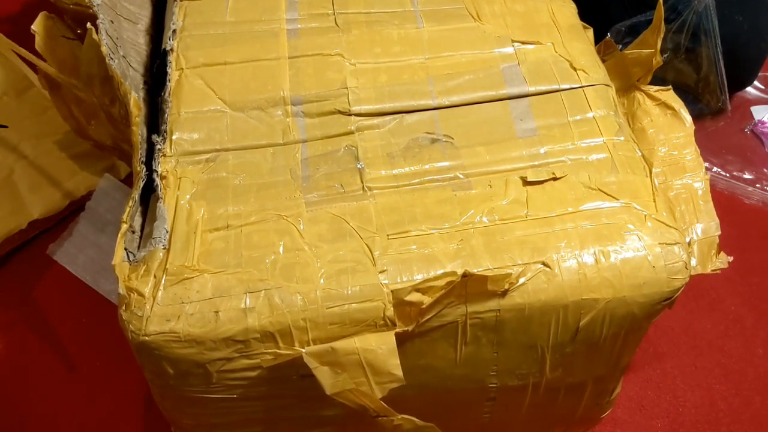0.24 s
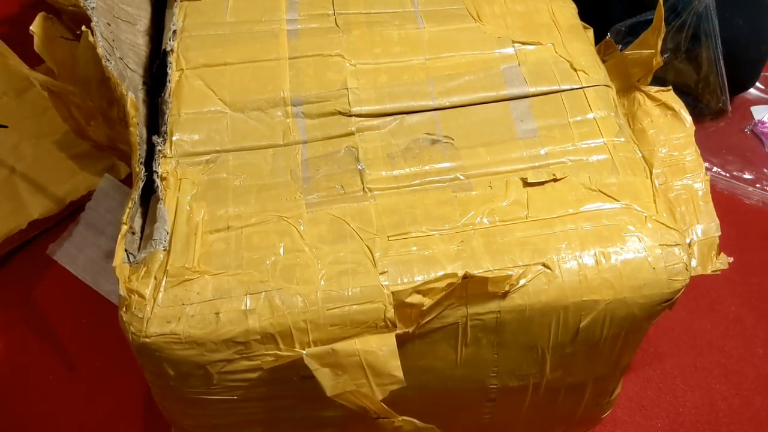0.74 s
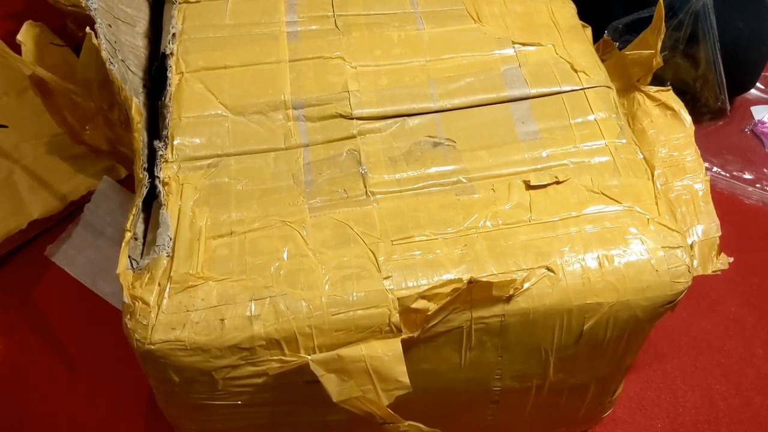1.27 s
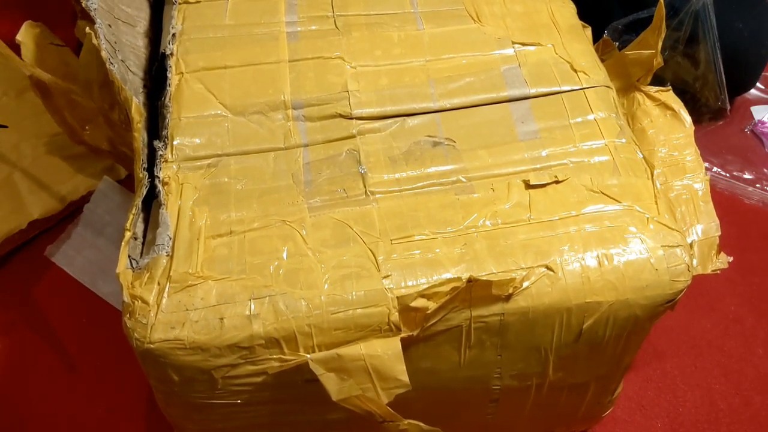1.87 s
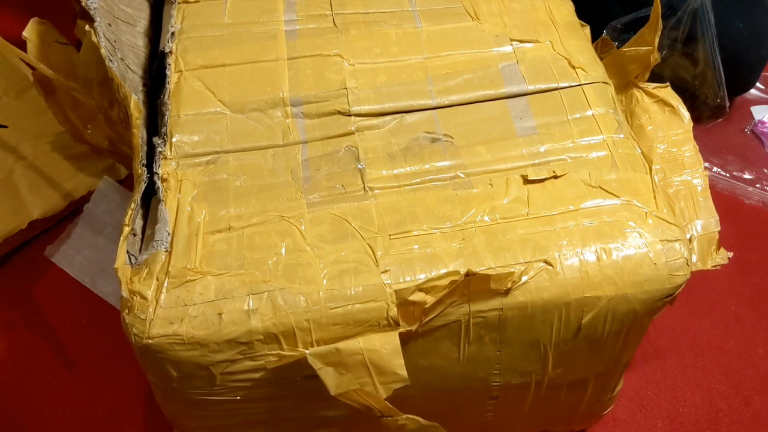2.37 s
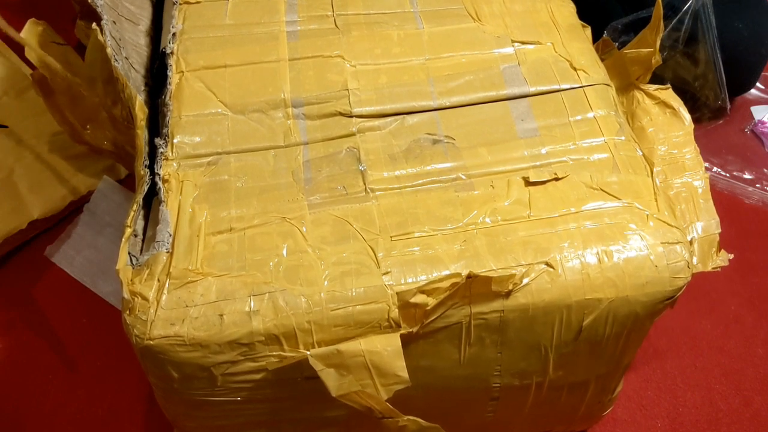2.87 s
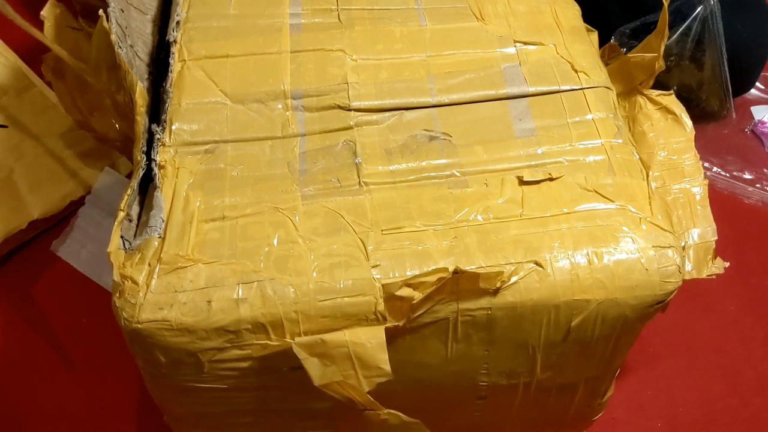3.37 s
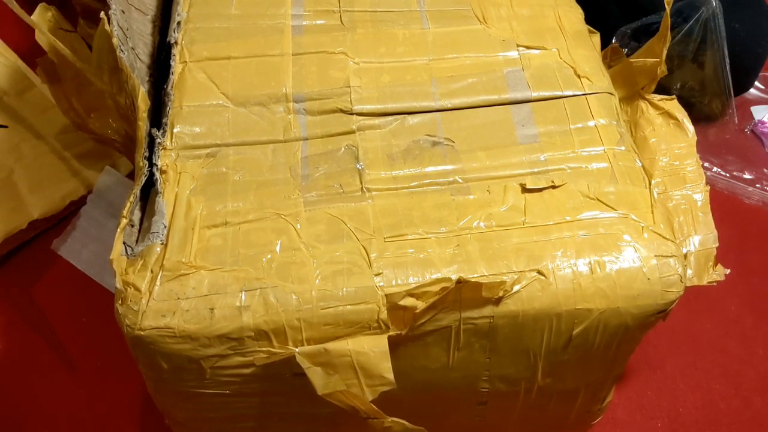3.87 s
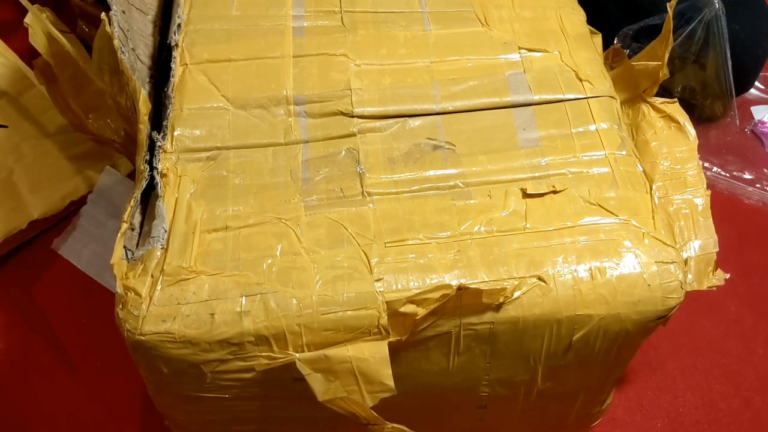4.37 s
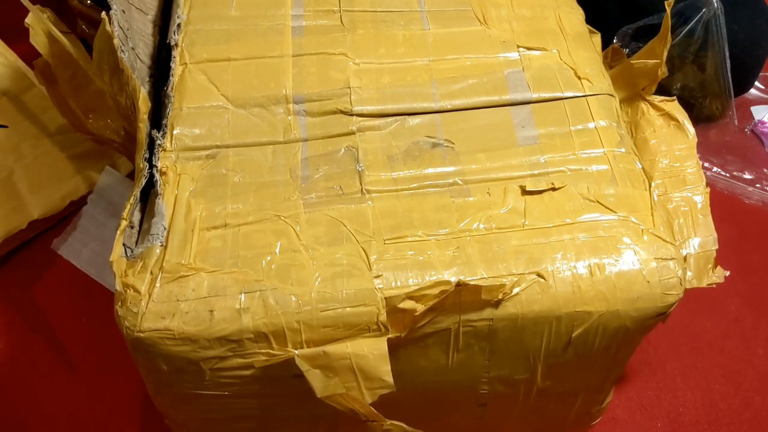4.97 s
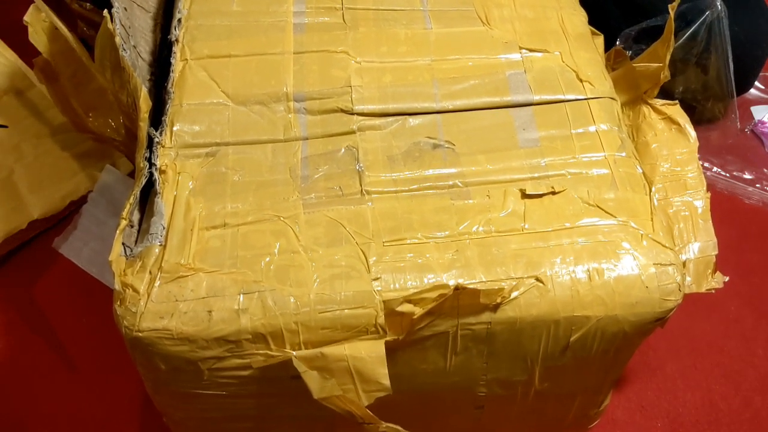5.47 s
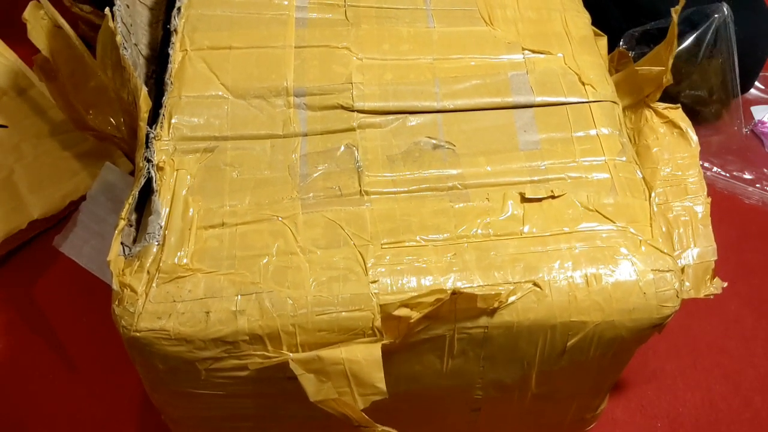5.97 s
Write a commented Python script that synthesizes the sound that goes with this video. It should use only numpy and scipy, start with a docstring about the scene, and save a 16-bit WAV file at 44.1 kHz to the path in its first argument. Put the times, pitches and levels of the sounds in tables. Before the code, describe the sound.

Dry crackles, fibre rasps and tape rustle from a blade working a hollow carton, sparse at first, then louder with heavier cracks.

```python
"""Scissors on a cardboard box

Scissors saw, rub and pry at a taped cardboard box in a small quiet room, a little to the left.
Dense trains of tiny blade slips, made of noise, ring the box wall, rasp the card and rustle the tape.
Short noise bursts make the snaps, and dying sine waves make the thumps of the hollow box.
A faint hum and hiss lie under it, and fading noise makes the echo of the room.
"""
import sys
import numpy as np
from scipy import signal
from scipy.fft import rfft, irfft, next_fast_len
from scipy.io import wavfile
from scipy.ndimage import map_coordinates

SR = 44100
rng = np.random.default_rng(int(sys.argv[2]) if len(sys.argv) > 2 else 0)


def undo_db(level):
    """Turn decibels back into plain size, where 20 dB means ten times bigger."""
    steps = np.asarray(level, float) / 20
    return 10 ** steps


def store_pcm(level_fs):
    """Save levels as 16-bit WAV."""
    pcm = np.round(np.clip(level_fs, -1, 1) * 32767).astype(np.int16)
    wavfile.write(sys.argv[1], SR, np.atleast_2d(pcm).T)


N = 275184  # length in samples
SECONDS = np.arange(N) / SR


def unit(x):
    """Scale to an rms of 1."""
    return x / np.sqrt(np.mean(x ** 2) + 1e-20)


def along(points, hz):
    """Read a value between (Hz, value) points, on a log frequency axis."""
    point_hz, value = np.transpose(points)
    return np.interp(np.log(hz + 1), np.log(point_hz + 1), value)


def wobble(rate):
    """A smooth random curve with rate knots a second."""
    knots = rng.standard_normal(int(N * rate / SR) + 4)
    return map_coordinates(knots, [np.arange(N) * rate / SR])


def filtered(x, response):
    """Shape a sound by a gain (real or complex) that depends on frequency."""
    size = next_fast_len(N + SR // 2)
    hz = np.fft.rfftfreq(size, 1 / SR)
    return irfft(rfft(x, size) * response(hz), size)[..., :N]


def modes(table):
    """A set of resonances (Hz, width Hz, dB), added with alternating sign."""
    def response(hz):
        total = 0
        for k, (centre, width, db) in enumerate(table):
            peak = 1j * hz * width / (centre * centre - hz * hz + 1j * hz * width)
            total = total + (-1) ** k * undo_db(db) * peak
        return total
    return response


def colour(spectrum):
    """Gain that follows a spectrum table."""
    return lambda hz: undo_db(along(spectrum, hz))


def spread(pair, alike):
    """Make left and right from a shared and an unshared signal, as alike as the table says."""
    turn = lambda hz: np.arccos(np.clip(along(alike, hz), -1, 1)) / 2
    mid, side = filtered(pair, lambda hz: np.array([np.cos(turn(hz)), np.sin(turn(hz))]))
    return np.array([mid + side, mid - side])


def slips(rate, life_s, scatter_db, smooth):
    """Two noises under one random train of dying slips (rate per second), over a smooth share."""
    chance, size_draw = rng.random((2, N))
    sizes = (chance < rate / SR) * undo_db(-scatter_db * np.log(size_draw + .02))
    train = signal.lfilter([1], [1, -np.exp(-1 / (life_s * SR))], sizes)
    envelope = (unit(train) + smooth) / (1 + smooth)
    return unit(envelope * rng.standard_normal((2, N)))


def add(track, s, sound):
    """Mix a sound into the track at time s."""
    start = round(s * SR)
    track[:, start:start + sound.shape[-1]] += sound


# Colour of the room's hiss and rumble: hz, level_db (per Hz, relative)
ROOM_TONE = [(15, -10), (25, 13.5), (123, 2.5), (344, -31), (887, -23), (2050, -18.5), (9570, -19),
             (15400, -34)]
# How alike left and right are, for the background and the echo: hz, likeness (0-1)
ALIKE_TONE = [(60, 0.79), (500, 0.05), (4000, 0.077)]


def room_tone():
    """Far hiss and rumble are coloured noise; the mains hum is a sine of unsteady pitch."""
    hiss = unit(spread(filtered(rng.standard_normal((2, N)), colour(ROOM_TONE)), ALIKE_TONE))
    hum_hz = 119.5 + 1.1 * wobble(3.9)
    hum = np.sin(2 * np.pi * np.cumsum(hum_hz) / SR) * undo_db(-69.5)
    return hiss * undo_db(-68.0) + hum


# How long the echo takes to fade by 60 dB: hz, fade_s
ROOM = [(150, 0.44), (1000, 0.25), (5000, 0.1)]


def room(x):
    """The walls answer with noise in which each frequency dies at its own speed; bass is most alike."""
    hz, t, grains = signal.stft(rng.standard_normal((2, SR // 3)), SR, nperseg=256)
    fade = undo_db(-60 * t / along(ROOM, hz)[:, None])
    tail = signal.istft(grains * fade, SR, nperseg=256)[1]
    delayed = np.pad(x, (300, 0))[None]  # in samples
    wet = signal.fftconvolve(delayed, tail / np.linalg.norm(tail[0]), axes=1)[:, :N]
    return spread(wet, ALIKE_TONE)


# Knocks on the hollow box: start_s, level_db (before the onset softens it), pitch_hz
KNOCKS = [(0.04, -50, 430), (0.053, -48.5, 480), (0.078, -55, 550), (0.295, -51, 94.2), (0.299, -52, 420),
          (0.437, -48.5, 196), (0.699, -47, 416), (0.974, -43, 135), (1.374, -37.5, 183), (1.532, -42, 113),
          (1.735, -41, 416), (1.8, -39.5, 192), (1.986, -38.5, 142), (2.236, -49, 403), (2.655, -42.5, 428),
          (2.708, -51, 493), (2.918, -37.5, 157), (3.1, -42, 347), (4.651, -32, 129), (4.661, -36, 967),
          (4.734, -35, 340), (4.846, -33.5, 414), (4.969, -39, 403), (5.555, -34, 61), (5.921, -45, 477)]


def knocks():
    """Each knock rings one hollow mode for a few cycles over a deep push."""
    track, t = np.zeros((2, N + SR)), np.arange(SR // 5) / SR
    onset = 1 - np.exp(-t / 0.00031)
    push = undo_db(-23.5) * np.sin(2 * np.pi * 62 * t) * undo_db(-60 * t / 0.43)
    for s, db, hz in KNOCKS:
        ring = np.sin(2 * np.pi * hz * t) * undo_db(-60 * t / 0.037)
        add(track[:1], s, undo_db(db) * (ring + push) * onset)  # only in the shared signal
    return track[:, :N]


# Resonances of the box wall: pitch_hz, width_hz, level_db
WALL = [(558, 160, -3), (898, 205, 6), (1205, 380, 7.5), (1329, 200, 9.5), (1630, 280, 0.5)]


def wall_ring(near_edge):
    """Low modes answer on the open panel, high modes near the stiff edge; above them it is dark."""
    edge_power = 4 * (np.clip(near_edge, 0, 1) - .5)
    tilt = lambda hz: np.abs((1 + 1j * hz / 500) / (1 + 1j * hz / 2500)) ** edge_power
    steep = lambda hz: 1 / (1 - (hz / 1750) ** 2 + 1j * hz / 1750 * 1.16)
    return lambda hz: modes(WALL)(hz) * tilt(hz) * steep(hz)


# Where the blade works: time_s, nearness to the box edge (0-1)
PLACE = [(.9, 0.3), (1.4, 0), (1.8, 0.5), (2.2, 0), (3, 0.66), (4, 1), (4.4, 0.7), (4.8, 0.25), (5.3, 0.93),
         (5.8, 0.95), (6.24, 0.52)]


def edge_nearness(seconds):
    """How near the blade is to the stiff edge of the box, gliding between the given places."""
    return np.interp(seconds, *np.transpose(PLACE))


LEAD_S = .001  # a snap creaks this long before it breaks


def bursts(count, t60, response):
    """Short dying noise pairs through a response, each of peak 1."""
    t = np.arange(SR // 20) / SR
    settling = undo_db(-19 - 700 * t)  # loose fibres settle behind the break
    envelope = np.where(t < LEAD_S, .15, undo_db(-60 * t / t60) + settling)
    noise = rng.standard_normal((count, 2, len(t))) * envelope
    noise[:, 0, round(LEAD_S * SR)] += 6  # the break itself is one sharp push
    rung = irfft(rfft(noise) * response(np.fft.rfftfreq(len(t), 1 / SR)))
    return rung / np.abs(rung).max(axis=(1, 2), keepdims=True)


# Snaps of tape and fibre: start_s, crack_peak_db, wall_peak_db, crack_pitch_hz
# (peaks before the sound is placed left and right)
SNAPS = [(0.2926, -44, -58, 2970), (0.4354, -37, -57, 4400), (0.5576, -26.5, -39.5, 5000),
         (0.5782, -46, -48, 3910), (0.6988, -25, -48, 7300), (0.7548, -67, -43, 3960),
         (0.9745, -38, -39, 2630), (1.1883, -33, -79, 7440), (1.3446, -52, -39.5, 7930),
         (1.377, -34, -29.5, 2700), (1.483, -32.5, -36.5, 4490), (1.499, -31.5, -33.5, 2540),
         (1.6962, -26, -43, 12100), (1.7333, -26, -44.5, 9600), (1.826, -40.5, -48, 1700),
         (1.9834, -38, -39, 3100), (2.2334, -34.5, -40, 4080), (2.3034, -28.5, -58, 5970),
         (2.3326, -28.5, -76, 13500), (2.5108, -41, -48, 2520), (2.6599, -25, -41.5, 11800),
         (2.718, -20.5, -57, 11200), (2.729, -30, -49, 8000), (2.818, -28.5, -47.5, 11800),
         (2.893, -38, -52, 3200), (2.9152, -27.5, -46, 3900), (2.9555, -34, -46, 3950),
         (3.0998, -23.5, -47, 8900), (3.159, -24.5, -39, 4130), (3.1634, -25, -44, 4070),
         (3.854, -34, -42.5, 7000), (4.2023, -33.5, -45, 4570), (4.311, -28.5, -32, 2500),
         (4.6503, -23.5, -27, 3400), (4.7355, -32.5, -33, 3050), (4.741, -29.5, -37, 3400),
         (4.8447, -45, -33, 1500), (4.8502, -31, -45, 4000), (4.902, -42, -41, 2270),
         (4.9662, -26.5, -34.5, 1570), (5.0864, -47, -35, 3690), (5.3098, -23, -29.5, 3050),
         (5.3251, -37, -34, 3670), (5.3781, -24, -25.5, 3060), (5.394, -36, -39.5, 3300),
         (5.57, -22.5, -49, 7950), (5.7452, -16.5, -20.5, 3200), (5.7577, -23, -25.5, 3160),
         (5.813, -43, -36.5, 3000), (5.987, -32, -58, 8000), (6.1302, -32, -36.5, 2290),
         (6.1565, -37, -37, 2340), (6.231, -32.5, -36, 3460)]


def snaps():
    """Each snap is a crack of a few ms around its own pitch that also rings the wall."""
    track = np.zeros((2, N + SR))
    s, crack_db, wall_db, centre_hz = np.transpose(SNAPS)
    near_edge = edge_nearness(s)[:, None, None]
    rings = bursts(len(s), 0.012, wall_ring(near_edge))
    centre_hz = centre_hz[:, None, None]
    width_hz = 1.57 * centre_hz
    cracks = bursts(len(s), 0.013, lambda hz: modes([(centre_hz, width_hz, 0)])(hz) ** 3)
    for k, at in enumerate(s):
        add(track, at, undo_db(wall_db[k]) * rings[k] + undo_db(crack_db[k]) * cracks[k])
    return track[:, :N]


# The blade's strokes: start_s (of the hold), hold_s, wall_scrape_db,
# cardboard_rasp_db (over the scrape), tape_rustle_db (over the scrape)
STROKES = [(0.25, 0.1, -87, -18, 19), (0.558, 0.014, -63.5, 2, 9), (0.697, 0.036, -63.5, 2.5, 4),
           (0.96, 0.028, -48, -12, -9.5), (1.325, 0.085, -56.5, -9.5, 0), (1.499, 0.022, -43.5, -1.5, -3),
           (1.555, 0.024, -59.5, -3.5, -3), (1.62, 0.017, -48.5, -4.5, -5), (1.696, 0.048, -55, -8, -0.5),
           (1.77, 0.05, -51.5, -13, 2), (1.984, 0.022, -61, -26, 8.5), (2.214, 0.14, -82, 9, 22),
           (2.488, 0.064, -63, -8, 7), (2.587, 0.069, -52, -6, 3.5), (2.691, 0.15, -57.5, -12, 3),
           (2.906, 0.017, -47, -1, -3), (2.967, 0.19, -55.5, -6, 0.5), (3.143, 0.056, -56, -0.5, 2.5),
           (3.271, 0.2, -61.5, -2, -0.5), (3.537, 0.076, -54, -8.5, -6.5), (3.623, 0.19, -52, -8, -0.5),
           (3.837, 0.17, -55.5, -3.5, -0.5), (4.011, 0.019, -45.5, -6.5, -5.5),
           (4.136, 0.033, -57.5, -14, -6), (4.215, 0.031, -49.5, -6, -4), (4.259, 0.11, -43, -7.5, -1.5),
           (4.347, 0.056, -38.5, -7, -3.5), (4.6, 0.078, -57.5, -42, -44), (4.735, 0.057, -46.5, -12.5, -7),
           (4.845, 0.053, -47.5, -19, -17), (5.003, 0.08, -51, -1.5, -0.5), (5.02, 0.026, -52, 5, 7.5),
           (5.267, 0.044, -39, -3.5, -8.5), (5.313, 0.032, -40, -6.5, -8), (5.373, 0.054, -59, 2.5, 0.5),
           (5.497, 0.072, -42.5, -3.5, 2.5), (5.596, 0.075, -61, -8, 2.5), (5.669, 0.027, -47.5, -6.5, 0),
           (5.712, 0.015, -44, -3.5, -3.5), (5.748, 0.066, -43.5, -9, -10.5),
           (5.919, 0.033, -44.5, -1, -1.5), (5.993, 0.072, -56, -6, -6), (6.111, 0.11, -47, -11.5, -7),
           (6.235, 0.013, -33.5, -22, -9.5)]
# The hand never leaves the box, so each layer keeps a floor: level_db for wall, rasp, tape
RESTING_DB = [-75.5, -77.5, -70.5]
BITE_DB_PER_S, RELEASE_DB_PER_S = 973, 587  # every stroke rises to its hold and falls from it so fast
DOME_DB = 4.5  # the blade is fastest mid-stroke: the ends of the hold lie this much lower
FREED_S = .011  # a stroke this soon after a snap was set free by it and starts with it


def stroke_gains():
    """Wall, rasp and tape gains for every sample: each stroke bites, holds and lets go."""
    s, hold_s, wall_db, rasp_db, tape_db = np.transpose(STROKES)[:, :, None]
    t = np.arange(0, N / SR + .01, .001)
    bite_db = -BITE_DB_PER_S * np.maximum(s - t, 0)
    release_db = -RELEASE_DB_PER_S * np.maximum(t - s - hold_s, 0)
    dome_db = -DOME_DB * np.clip(2 * (t - s) / hold_s - 1, -1, 1) ** 2
    shape_db = bite_db + release_db + dome_db
    since_snap = s - np.transpose(SNAPS)[0]
    freed = (since_snap >= 0) & (since_snap < FREED_S)
    freed_at = np.where(freed, s - since_snap, 0).max(axis=1, keepdims=True)
    shape_db = np.where(t < freed_at, -200, shape_db)  # silent until its snap
    gains = []
    for db, rest_db in zip((wall_db, wall_db + rasp_db, wall_db + tape_db), RESTING_DB):
        gain = undo_db(db + shape_db).sum(axis=0) + undo_db(rest_db)
        gains.append(np.interp(SECONDS, t, gain))
    return gains


# Resonances of the hollow box: pitch_hz, width_hz, level_db
HOLLOW = [(56, 63, -6), (109.5, 50, -0.5), (157, 44, 1.5), (257, 132, -0.5), (423.7, 55, 4), (605, 420, -8)]


def hollow_shake(wall_gain):
    """The hollow box shakes with the force of the stroke, driven by sparse slips."""
    force = undo_db(-77.0) + undo_db(-17.5) * wall_gain ** 0.84
    return force * unit(filtered(slips(200, 0.0027, 1.0, 0.31), modes(HOLLOW)))


# Colour of the tape's rustle: hz, level_db (per Hz, relative)
TAPE = [(1470, -6.5), (2500, -6), (5500, -2), (11600, -3), (15400, -5.5)]


def tape_rustle(tape_gain, chatter, fused):
    """Stiff tape rustles in dense slips and crackles in sparse sharp creases."""
    rustle = unit(filtered(slips(2200, 0.0033, 6.3, 0.44) * chatter, colour(TAPE)))
    creases = unit(filtered(slips(240, 0.0009, 3.8, 0.05), colour(TAPE)))
    return tape_gain * rustle + undo_db(-6) * tape_gain / (1 + fused) * creases


# Resonances of the card's fibre: pitch_hz, width_hz, level_db (each before squaring)
RASP = [(2580, 3050, -0.5), (4010, 870, 3.5), (5690, 440, -1.5)]


def card_rasp(blade, rasp_gain):
    """The blade rasps the fibre; the flexing card slides its resonances up and down."""
    twice = lambda hz: modes(RASP)(hz) ** 2  # steep flanks leave a dip above the wall's ring
    bend = np.clip(.5 + 0.35 * wobble(22), 0, 1)
    slack = unit(filtered(blade, lambda hz: twice(hz * 1.1)))
    taut = unit(filtered(blade, lambda hz: twice(hz * .92)))
    return rasp_gain * unit(bend * taut + (1 - bend) * slack)


def wall_scrape(blade, wall_gain):
    """The slipping blade rings the wall, blended between open panel and stiff edge."""
    near_edge = np.clip(edge_nearness(SECONDS) + 0.2 * wobble(14), 0, 1)
    panel, edge = (unit(filtered(blade, wall_ring(place))) for place in (0, 1))
    return wall_gain * ((1 - near_edge) * panel + near_edge * edge)


FUSE_DB = -39  # around this scrape level single slips begin to fuse into an even tear


def strokes():
    """Stick-slip of the blade rings the wall, rasps the fibre, rustles the tape and shakes the box."""
    wall_gain, rasp_gain, tape_gain = stroke_gains()
    fused = wall_gain / undo_db(FUSE_DB)
    chatter = undo_db(1.5 * wobble(80) / (1 + fused))  # slips come in clumps
    blade = slips(900, 0.0007, 2, 0.55 + fused) * chatter
    scrape = wall_scrape(blade, wall_gain) + card_rasp(blade, rasp_gain)
    return scrape + tape_rustle(tape_gain, chatter, fused) + hollow_shake(wall_gain)


# How alike the box sounds left and right: hz, likeness (0-1)
ALIKE = [(60, 1), (300, 0.62), (1200, 1), (3000, 0.5), (10000, 0.35)]
# How much louder the box is on the left than on the right: hz, difference_db
LEAN = [(60, -0.5), (300, 4.5), (10000, 2)]


def place_box(box):
    """Above the deep bass the box is louder on the left; it reaches the left a little later."""
    side, lag_s = np.array([[.5], [-.5]]), 6e-5  # half of each difference to either side
    lean = lambda hz: undo_db(side * along(LEAN, hz))
    lag = lambda hz: np.exp(-2j * np.pi * hz * side * lag_s)
    return filtered(spread(box, ALIKE), lambda hz: lean(hz) * lag(hz))


def scene():
    """The worked box, its echo in the room and the room's own quiet tone add up."""
    box = strokes() + snaps() + knocks()
    return place_box(box) + undo_db(-13.0) * room(box[0]) + room_tone()


def low_pass(x):
    """Removes everything above the highest recorded frequency."""
    return signal.sosfilt(signal.butter(12, 15500, fs=SR, output="sos"), x)


def record(dry):
    """Cut everything from 15500 Hz up and finish the mix."""
    mix = filtered(dry, lambda hz: hz < 15500)
    return low_pass(mix)


dry = scene()
out = record(dry)
store_pcm(out)
```